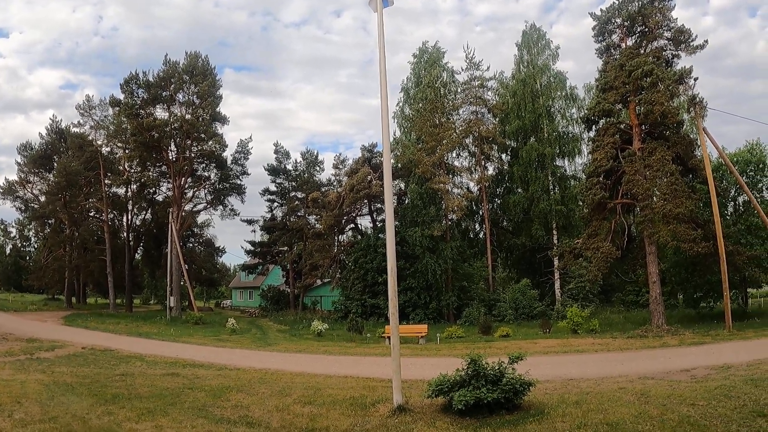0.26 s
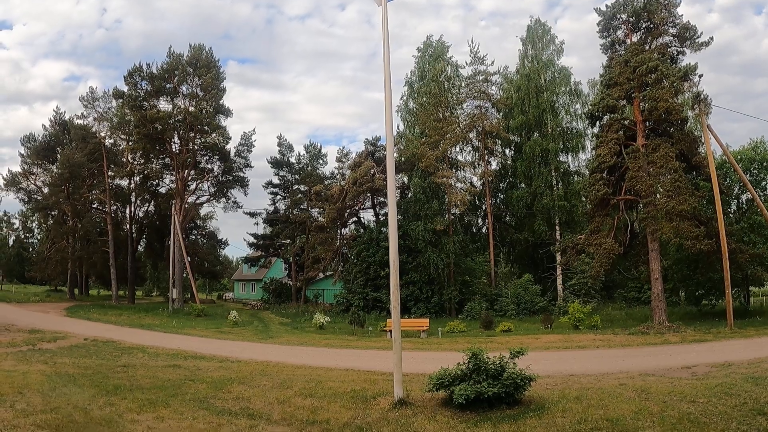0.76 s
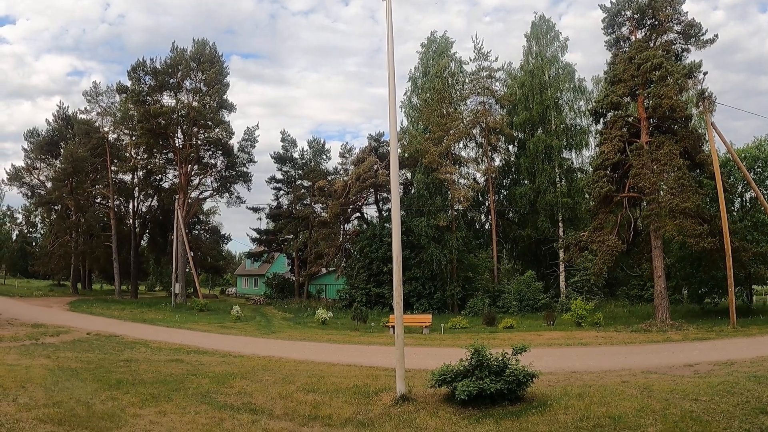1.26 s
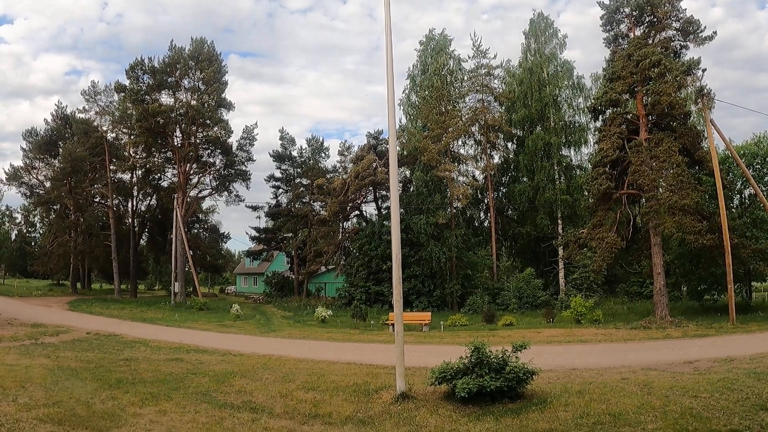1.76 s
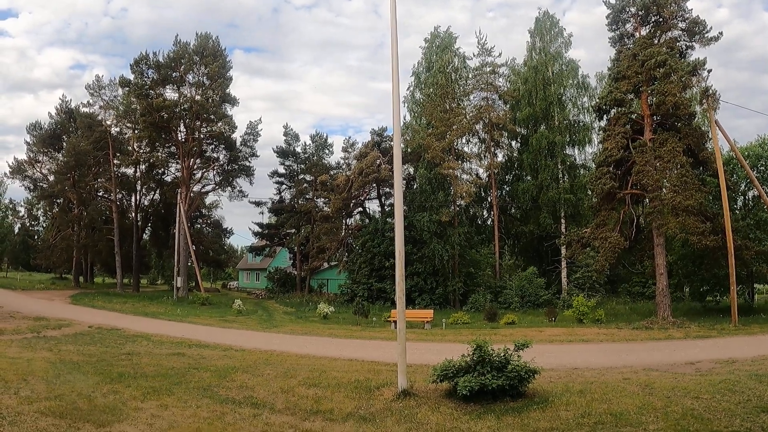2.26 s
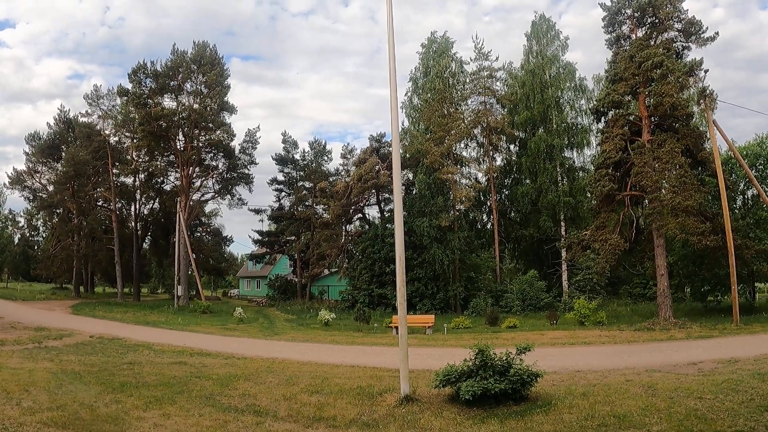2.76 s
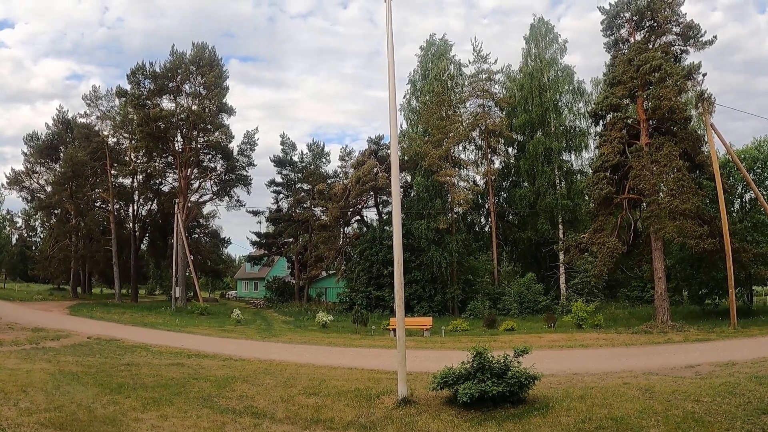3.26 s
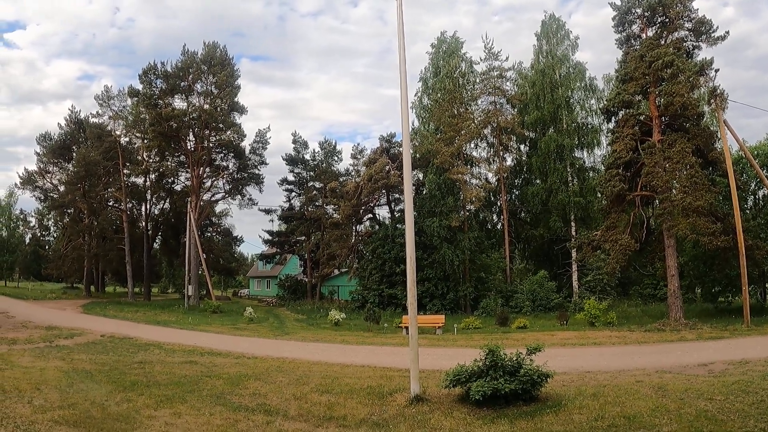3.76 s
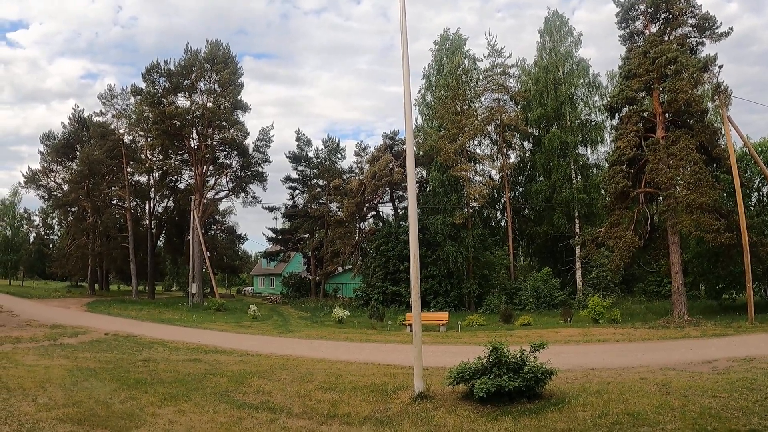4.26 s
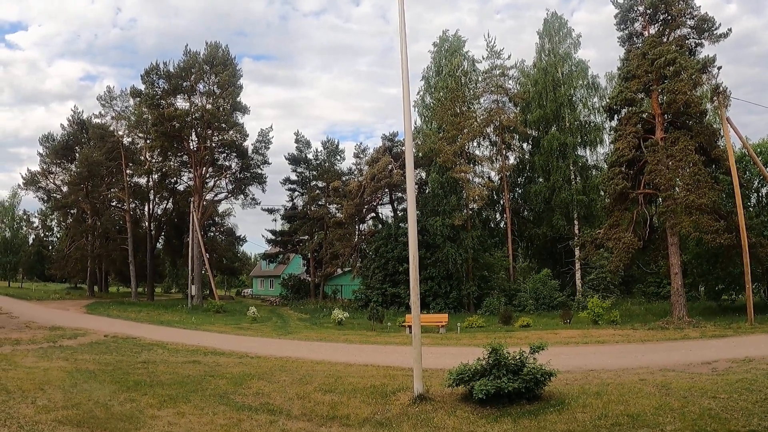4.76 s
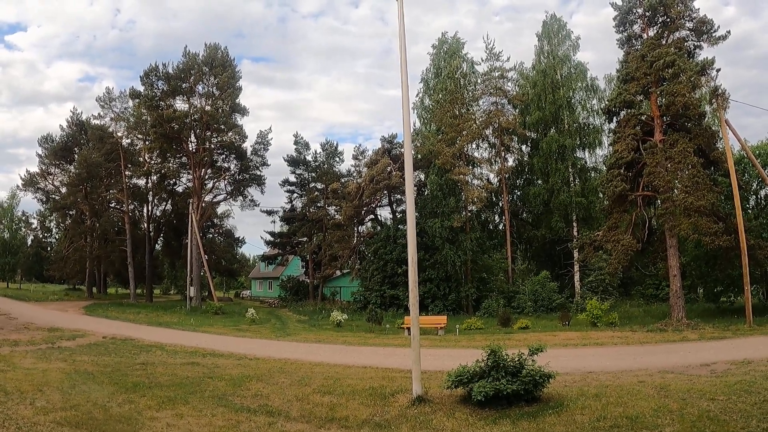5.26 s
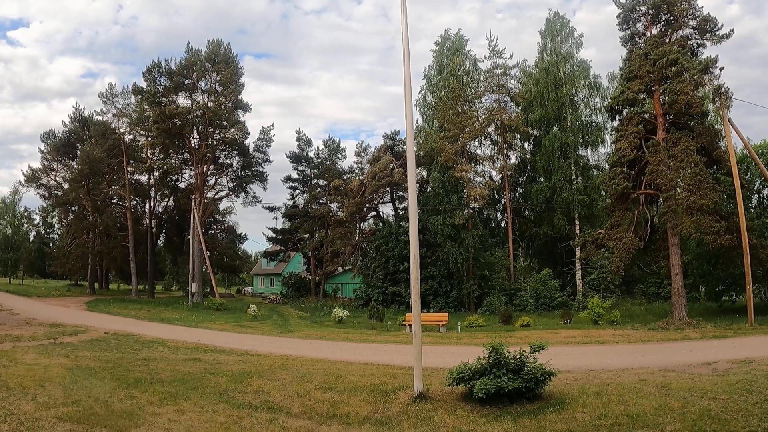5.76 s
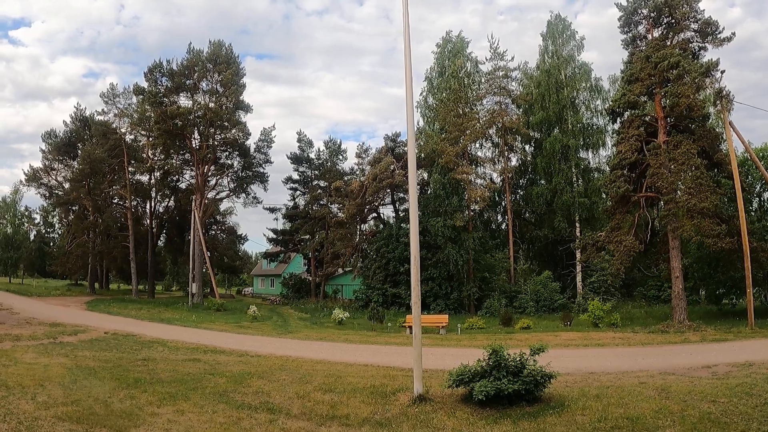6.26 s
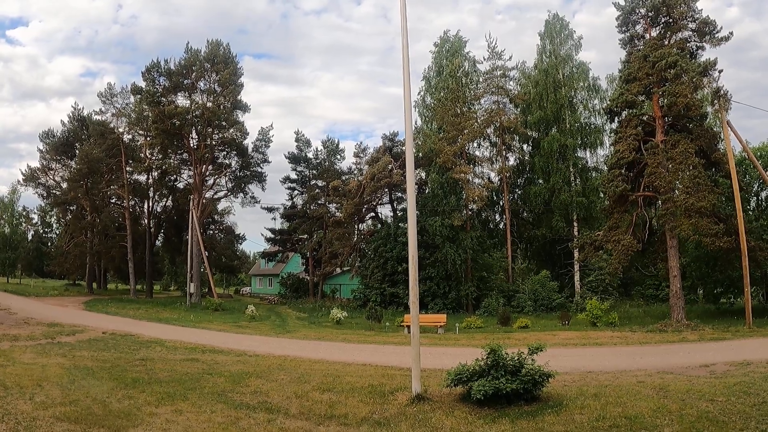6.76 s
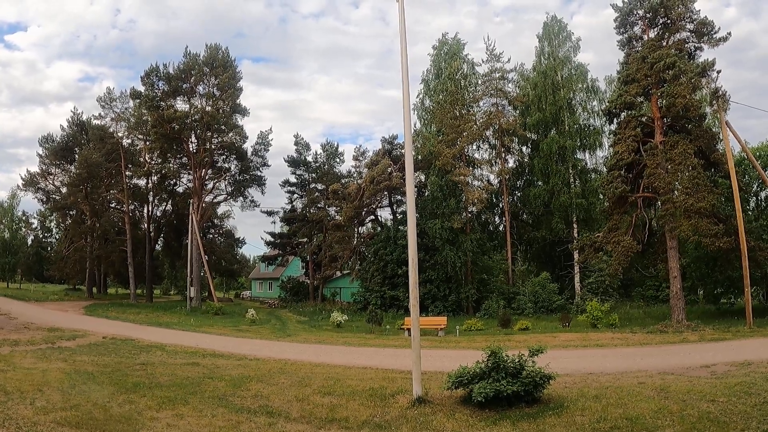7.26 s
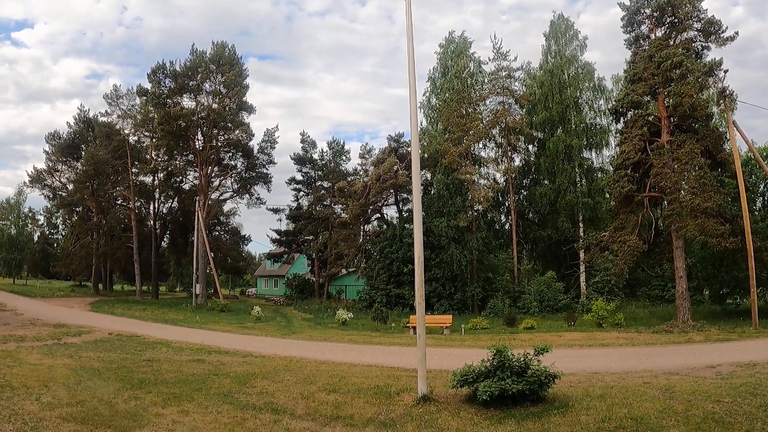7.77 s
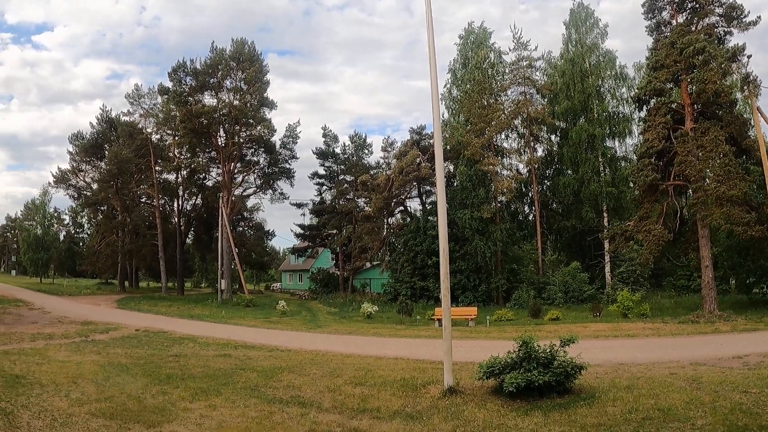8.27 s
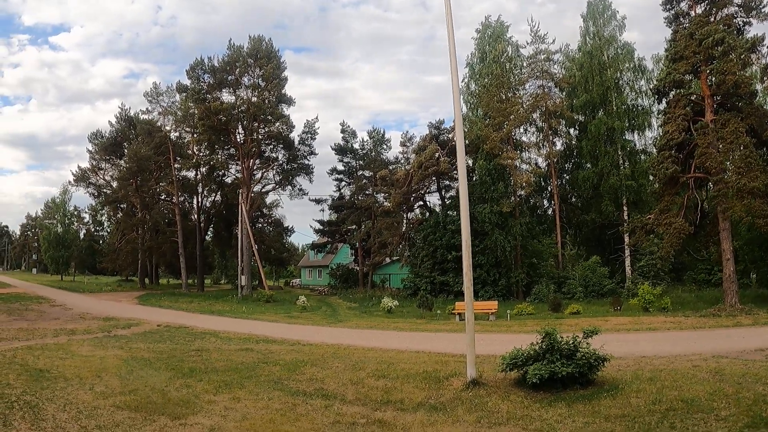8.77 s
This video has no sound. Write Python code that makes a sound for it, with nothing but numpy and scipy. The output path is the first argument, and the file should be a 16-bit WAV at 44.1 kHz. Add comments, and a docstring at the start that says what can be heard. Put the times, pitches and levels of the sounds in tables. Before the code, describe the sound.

An oriole's fluted whistles and harsh catlike squalls alternate with a rattling finch over distant birdsong, low hum and late microphone bumps in a wooded park.

```python
"""Birds in a pine and birch clearing

An oriole flutes three phrases in gliding tones; catlike squalls in rough, throaty overtone stacks cut in,
with one short arched call of another bird. A finch rattles through repeated syllables and buzzes;
short gliding whistles and chips fill the gaps, some of them faint oriole notes.
Sparse reflections make the wood answer, over a far chorus of noise and chirps and a low hum of drifting noise.
The hand on the microphone gives low rumbles, ringing knocks and dry ticks.
"""
import sys
import numpy as np
from scipy import signal
from scipy.fft import rfft, irfft
from scipy.io import wavfile
from scipy.ndimage import uniform_filter1d

SR = 44100
rng = np.random.default_rng(int(sys.argv[2]) if len(sys.argv) > 2 else 0)


def output_pcm(signal):
    """Save a mono or channel-first signal as 16-bit PCM at the path in sys.argv[1].

    Samples are clipped to [-1, 1] before scaling.
    """
    pcm = np.clip(np.atleast_2d(signal).T, -1, 1) * 32767
    wavfile.write(sys.argv[1], SR, np.round(pcm).astype(np.int16))


N = 397341  # length in samples

# Fluted oriole notes: start_s, slide_in_s, hold_s, slide_out_s, from_hz, held_hz, to_hz,
# level_db (at the end of the hold), swell_db (rise over the hold)
ORIOLE_NOTES = [ (1.366, 0.047, 0.015, 0.074, 1537, 2266, 1940, -55.5, -5.5),
                (1.548, 0.013, 0.083, .015, 2143, 2070, 2090, -44.5, 7.5),
                (1.657, 0.021, 0.057, 0.098, 2100, 2073, 1986, -35, 7),
                (1.895, .045, 0.059, 0.0082, 1343, 1733, 1770, -36, -1.5),
                (2.022, 0.017, 0.0032, 0.031, 2120, 1905, 1732, -33, 4),
                (2.079, 0.016, .022, 0.074, 1502, 1442, 1113, -43.5, -6.5),
                (6.029, 0.046, 0.065, 0.045, 2210, 2470, 2310, -52.5, 0),
                (6.178, 0.026, 0.01, 0.0059, 1730, 1945, 1950, -51.5, -4.5),
                (6.251, 0.039, 0.015, 0.0072, 1898, 1736, 1743, -34, 6),
                (6.388, 0.035, 0.021, 0.039, 2207, 2136, 2000, -42.5, 7.5),
                (6.501, 0.06, 0.024, 0.046, 1387, 1718, 1385, -34, 1),
                (6.691, 0.053, 0.032, 0.023, 1277, 1189, 1030, -47, 1.5),
                (6.801, .04, .135, .06, 1410, 1624, 1242, -41.5, -7.5),
                (7.03, 0.029, 0.013, 0.011, 1258, 1154, 1150, -56.5, -2.5),
                (8.278, 0.066, 0.024, 0.059, 2260, 1790, 1417, -37.5, 6),
                (8.515, 0.012, 0.037, 0.0084, 1616, 1534, 1500, -51.5, 14),
                (8.572, 0.044, .05, 0.018, 1538, 2075, 1700, -44, 0),
                (8.687, 0.027, 0.0085, 0.014, 1530, 1433, 1380, -52, 2),
                (8.742, 0.041, 0.013, 0.0092, 1364, 1297, 1180, -48, 8), ]
# Where whistles and chips lean in stereo: time_s, left_over_right_db
WHISTLE_PAN = [(1.6, 0.5), (2.1, 1), (6.1, 0), (6.8, 2.5), (8.4, 1.5)]
CREEP_HZ_PER_S = 300  # a held note creeps upward
FLUTE_IN_DB, FLUTE_OUT_DB = -12, -8.5  # level offset at the far ends of the slides

# Throaty calls, one list a call: four catlike squalls and, third, a short arched call of another bird:
# time_s, pitch_hz (before the jump at the crack), level_db (before wavering)
THROATY_CALLS = [
    [(0, 868, -36), (.03, 915, -50), (.05, 999, -42.5), (.13, 1007, -46.5), (.2, 1010, -51),
     (.28, 940, -59.5)],
    [(.47, 731, -57.5), (.51, 672.6, -53.5), (.59, 737, -49), (.65, 985, -42.5), (.74, 861, -47.5),
     (.795, 1023, -43.5), (.9, 952.4, -41.5), (1.02, 829, -56.5)],
    [(2.97, 935, -59), (2.995, 1204, -64), (3.04, 1253, -59), (3.085, 1190, -61)],
    [(3.87, 677, -51), (3.91, 741, -44.5), (4, 758.5, -45.5), (4.1, 830, -44.5), (4.18, 876, -44.5),
     (4.25, 899, -46), (4.29, 899, -48), (4.335, 1010, -55.5)],
    [(5.18, 819, -56.5), (5.245, 693, -56.5), (5.315, 788, -43.5), (5.41, 918, -40), (5.46, 851.5, -45),
     (5.53, 998, -41.5), (5.585, 1096, -39), (5.63, 1107, -40.5), (5.74, 1224, -47), (5.78, 1200, -75.5)],
]
# Roughening, one row a call: crack_s, shriek_s (scene time), pitch_jump (share of pitch);
# a change timed after the end of its call is never reached
CALL_CHANGES = [(.13, .19, .02), (.798, .92, .1), (3.2, 3.2, 0), (4.07, 4.28, 0), (5.595, 5.64, -.07)]
# Shrillness, one row a call: clear (0-1), shrieking (0-1)
CALL_SHRILLNESS = [(0.12, 0.57), (0.29, 1), (0.1, .3), (0.014, 0.85), (0.21, 0.72)]
# Throat response of a mellow call: frequency_hz, gain_db (relative)
MELLOW_THROAT = [(700, -51.5), (960, -21), (1500, -13.5), (2050, 1.5), (2600, 14.5), (3300, 9), (3850, -13),
                 (5300, -34.5), (7000, -15), (8800, -41), (10500, -34.5), (12300, -34), (14000, -58)]
# Throat response of a shrill call: frequency_hz, gain_db (relative)
SHRILL_THROAT = [(410, -63), (700, -55), (958, -33), (1090, -26), (2190, -6.5), (3400, -7.5), (4360, 11.5),
                 (5140, 4.5), (6200, 7.5), (8590, -31), (10600, -7.5), (11300, -22.5), (14000, -37)]
# Time to turn into the crack and into the shriek: seconds, seconds
TURN_S = (.03, .07)
CRACK_ROUGHNESS, SHRIEK_ROUGHNESS, HALF_PITCH_DEPTH = .26, .75, .55  # each 0-1

# Finch syllables, each a list of strokes: time_s (from the syllable's start), pitch_hz, level_db (relative)
FINCH_SYLLABLES = [
    [[(-.028, 4800, -12), (-.021, 4950, -4), (-.016, 4800, -8), (-.011, 3600, -22)], [(-.010, 3400, -12),
     (-.002, 4200, -6), (.003, 5000, 0), (.006, 5450, -8), (.016, 5780, -13)], [(.013, 4000, -16),
     (.022, 5200, -12), (.027, 5650, -5), (.038, 5780, -12)]],
    [[(-.015, 7940, -26), (-.011, 5110, -6), (-.007, 3770, -5.5)], [(-.004, 3810, -6), (.002, 4990, 0.5),
     (.009, 5340, -15)], [(.017, 4980, 0), (.028, 3894, 5), (.038, 2908, 2), (.044, 3427, 10),
     (.051, 4200, -16)], [(.052, 3420, -6.5), (.062, 3038, 6), (.076, 2177, -6)]],
    [[(-.003, 3230, -31), (.002, 3990, 6.5), (.009, 4360, -1.5)], [(.014, 4377, -19), (.024, 3170, 14.5),
     (.034, 2760, 4.5), (.045, 2170, 4)], [(.054, 2280, -5.5), (.063, 3255, 13), (.074, 3580, 3.5)],
     [(.082, 2402, 12.5), (.092, 2393, 5), (.106, 2007, 4.5)], [(.100, 2172, -11), (.110, 2376, -3),
     (.123, 2570, -26)]],
]
# Finch phrases: syllable (index), count, start_s, first_gap_s, shortening_s (of each next gap)
FINCH_PHRASES = [(0, 7, .2418, .0975, .0009), (1, 3, .8935, .1435, -.009), (0, 7, 4.7316, .0985, .0008),
                 (0, 7, 6.1848, .0982, .0018), (1, 6, 6.8247, .145, .0005), (2, 3, 7.6793, .1737, -.006)]
# Loudness, one row a phrase: first_syllable_db, full_voice_db (both relative)
FINCH_VOICE = [(-47, -31.5), (-34.5, -39.5), (-45.5, -39), (-45.5, -32), (-36.5, -34.5), (-39, -37.5)]
# Second and third partial of a stroke: level_db under the first
FINCH_PARTIALS_DB = (-40, -49)
WARM_UP_SYLLABLES = 2.7  # the voice covers 63% of the way to full in this many
# Echo off a trunk, one value a syllable type: level_db
TRUNK_ECHO_DB = (-12, -8.5, -7.5)
TRUNK_ECHO_S = 0.02

# Buzzy notes: start_s, slide_in_s, slide_out_s, from_hz, turn_hz, to_hz, level_db (before flutter),
# trill_width_hz (full width at the note's highest pitch)
BUZZ_NOTES = [(3.65, 0.06, 0.041, 4380, 4590, 4500, -61.5, 510),
              (7.819, 0.043, .02, 5400, 5000, 4800, -62, 500),
              (8.02, 0.016, 0.024, 5440, 5250, 4380, -61.5, 500),
              (8.209, 0.021, 0.078, 5730, 5580, 5820, -54.5, 600),
              (8.226, .02, 0.036, 5240, 5065, 5200, -49, 500),
              (8.375, .035, .19, 3900, 3808, 2220, -44.5, 1155)]

# Short gliding whistles and chips, some of them faint oriole notes:
# start_s, slide_in_s, slide_out_s, from_hz, turn_hz, to_hz, level_db
SHORT_NOTES = [ (1.061, 0.071, .08, 2040, 1915, 1855, -60.5), (1.171, 0.045, 0.14, 1600, 1546, 1420, -60.5),
               (1.51, 0.0096, 0.029, 1690, 1676, 1694, -50), (2.04, .03, .03, 7500, 7200, 7600, -68.5),
               (2.786, 0.016, 0.024, 4150, 3420, 3130, -48.5),
               (3.03, 0.014, 0.023, 3350, 2900, 2450, -53.5), (3.11, .015, 0.025, 2600, 2660, 2680, -55),
               (3.265, 0.013, 0.049, 5050, 5120, 5100, -68), (4.08, .02, .03, 4950, 4960, 5500, -66),
               (4.18, .03, 0.052, 5000, 4750, 5040, -61), (4.4, 0.019, .025, 2150, 1810, 1550, -82),
               (3.189, 0.024, 0.077, 8700, 7970, 8700, -74.5), (3.43, 0.027, 0.056, 4450, 3970, 3760, -65),
               (3.578, 0.025, 0.034, 6400, 5300, 5600, -65), (3.659, .035, .025, 3870, 3830, 3820, -61),
               (3.799, 0.032, 0.045, 4200, 3800, 2410, -59.5), (4.335, 0.018, 0.034, 3380, 3230, 3210, -55),
               (4.55, 0.019, .045, 2390, 2405, 2400, -62), (4.64, 0.026, 0.065, 2600, 2930, 3660, -55.5),
               (4.929, 0.025, 0.084, 3560, 2896, 4060, -53.5),
               (5.12, 0.083, 0.041, 3700, 3644, 3650, -54.5), (5.185, 0.032, 0.03, 3670, 3230, 3030, -51),
               (5.875, 0.023, 0.043, 3830, 3320, 3340, -49), (6.005, 0.018, 0.015, 3730, 3070, 2470, -56),
               (6.02, 0.048, 0.073, 1534, 2114, 2170, -57), (6.261, 0.023, 0.054, 3020, 3065, 2840, -48),
               (7.09, 0.013, .03, 2750, 2870, 3100, -48), (7.64, 0.017, 0.02, 3790, 3760, 3840, -50),
               (7.87, 0.07, 0.015, 1526, 1478, 1470, -58.5), (8.05, 0.022, 0.038, 1490, 1457, 1700, -52.5),
               (8.336, 0.019, 0.022, 2620, 3425, 4000, -41), (5.11, 0.064, .08, 2250, 2005, 1650, -60),
               (8.322, .006, 0.0097, 2920, 3550, 4260, -56), (8.876, 0.0056, 0.02, 2900, 2770, 2770, -60), ]
SHORT_IN_DB, SHORT_OUT_DB = 0, -6  # level offset at the far ends of the slides
# Thin high call that dives and climbs back: time_s, pitch_hz, level_db (relative)
SEEP_SHAPE = [(0, 9850, -12), (.024, 6440, 5.5), (.045, 7330, 1), (.06, 7900, 0), (.068, 9260, -23)]
# When the thin call sounds: time_s, level_db (added to its shape)
SEEP_TIMES = [(8.518, -68), (8.686, -64), (8.873, -63)]

# Phase between the channels for the near birds: frequency_hz, left_lead_rad
NEAR_BIRD_LEAD = [(1000, -1.1), (1700, -0.72), (3000, -0.87), (5000, -0.96), (9000, -0.56)]
WOOD_T60_S, WOOD_DB = 1.275, -7  # decay time at 1500 Hz, level of the whole tail

# Grip rumbles, one list a shift of the hand: time_s, level_db
GRIP_SHIFTS = [
    [(0, -52), (.12, -54.5), (.25, -61), (.33, -48.5), (.368, -38), (.42, -62), (.5, -68), (.8, -83)],
    [(8.26, -66), (8.33, -65), (8.42, -39.5), (8.52, -63), (8.62, -57.5), (8.72, -50.5), (8.9, -61),
     (9.01, -52.5)],
]
# Knocks on the microphone: time_s, peak_db
KNOCK_TIMES = [(8.38, -29.5), (8.609, -55), (8.99, -42.5)]
# Resonances of the microphone housing: pitch_hz, level_db (relative), t60_s
HOUSING_MODES = [(32, 1, .2), (189, 0, .12), (800, -28, .02)]
# Dry ticks: time_s, level_db (relative)
TICK_TIMES = [(8.7397, -41), (8.7588, -28), (8.8283, -30.5), (8.8743, -29), (8.8992, -29), (8.9292, -33),
              (8.9448, -40)]

# Loudness of the far chorus: time_s, level_db (of the hiss alone)
CHORUS_LEVEL = [(0, -59), (1.4, -55.5), (2.398, -57), (2.999, -58.5), (3.35, -62.5), (3.8, -58.5),
                (4.5, -58), (5.0, -59), (5.9, -56.5), (7.802, -56), (8.6, -62.5), (9.01, -62.5)]
# Spectrum of the far chorus: frequency_hz, density_db (relative, per Hz)
CHORUS_SPECTRUM = [(470, -80.5), (800, -35.5), (1390, -8.5), (1550, -4), (1790, 0), (2360, 0), (3000, 1),
                   (3720, 0.5), (5270, -11), (6230, -20), (8310, -26), (9370, -37), (14100, -35)]
CHIRPS_PER_S, CHIRPS_DB = 90, -2  # chirp level relative to the hiss

# Spectrum of the low air and hum: frequency_hz, density_db (relative, per Hz)
HUM_SPECTRUM = [(12, -66.5), (20, -25), (52, -23), (107, -32.5), (116, -21), (131, -13), (165, 1),
                (209, -7), (260, -14.5), (416, -20.5), (526, -23.5), (885, -25.5), (1100, -17), (1430, -16),
                (2420, -120)]
HUM_DB = -67

# Likeness of the steady noise at the two microphone ports: frequency_hz, likeness (0-1)
PORT_LIKENESS = [(60, 0.44), (150, 1), (370, 0.84), (900, 0.077), (2240, 0.11), (5520, 0.8), (13600, 0.19)]
# Balance of the steady noise: frequency_hz, left_over_right_db
PORT_BALANCE = [(60, -7.5), (150, 0.5), (370, -6), (900, -2.5), (2240, 3), (5520, -0.5), (13600, 7.5)]
# Phase of the steady noise: frequency_hz, left_lead_rad
PORT_LEAD = [(0, 1.3), (860, -1.42), (1210, -3), (3190, -2), (7060, 1), (8100, -2), (13800, -2.5)]
EDGE_HZ = 14000


def oriole(mix):
    """Fluted notes: near-pure syrinx tones slide in, hold and slide out, with a light shimmer."""
    for row in ORIOLE_NOTES:
        whistle(mix, *glide(*row, FLUTE_IN_DB, FLUTE_OUT_DB), shimmer=.3)


def throaty_calls(mix):
    """A stack of overtones through the throat; roughness smears each overtone into a band of noise."""
    for rows, changes, shrillness in zip(THROATY_CALLS, CALL_CHANGES, CALL_SHRILLNESS):
        start, (hz, db) = unroll(rows)
        count = len(hz)
        crack_s, shriek_s, jump = changes
        clear, harsh = shrillness
        t = start + np.arange(count) / SR
        cracked = np.clip((t - crack_s) / TURN_S[0], 0, 1)
        shrieking = np.clip((t - shriek_s) / TURN_S[1], 0, 1)
        rough = np.maximum(CRACK_ROUGHNESS * cracked, SHRIEK_ROUGHNESS * shrieking)
        shrill = np.clip(clear + (harsh - clear) * shrieking, 0, 1)

        hz = hz * (1 + jump * (cracked > 0))
        # unsteady vocal folds
        hz = hz * (1 + .014 * (1 + .4 * cracked) * flutter(count, hz=45).real)
        db = db + 2.2 * flutter(count, hz=35).real
        mouth = (900 / hz) ** .25  # the beak opens with rising pitch and lifts the throat resonance
        call, power = 0, 0
        for k in range(1, 17):
            mellow_db = read(MELLOW_THROAT, k * hz * mouth)
            throat_db = (1 - shrill) * mellow_db + shrill * read(SHRILL_THROAT, k * hz)
            blur = np.clip(rough + .07 * max(k - 4, 0), 0, 1)  # high overtones break up first
            smear = np.sqrt(1 - blur) + np.sqrt(blur) * flutter(count, hz=170 + 50 * k)
            waver_db = 1.8 * flutter(count, hz=30).real  # each overtone comes and goes by itself
            call = call + (tone(k * hz, throat_db + waver_db, edge=0.026) * smear).real
            power = power + gain_of(2 * throat_db)
        # alternate strong and weak pulses put lines at half the pitch
        call = call * (1 + HALF_PITCH_DEPTH * cracked * np.cos(np.pi * np.cumsum(hz) / SR))
        add(mix, start, gain_of(db) * call / np.sqrt(power), pan_db=0.2)


def finch(mix):
    """Repeats a syllable of swept strokes, pitch and level varying slightly, with an echo off a trunk."""
    for phrase, (first_db, full_db) in zip(FINCH_PHRASES, FINCH_VOICE):
        kind, count, first_s, gap_s, shortening_s = phrase
        for k in range(count):
            s = first_s + k * gap_s - shortening_s * k * (k - 1) / 2
            voice_db = full_db + (first_db - full_db) * np.exp(-k / WARM_UP_SYLLABLES)
            for rows in FINCH_SYLLABLES[kind]:
                start, (hz, db) = unroll(rows)
                detune = rng.normal(1, 0.0086)
                stroke = tone(hz * detune, db + voice_db - 9 + rng.normal(0, 1.5), edge=0.13)
                for partial, partial_db in enumerate(FINCH_PARTIALS_DB, start=2):
                    overtone = abs(stroke) * np.exp(1j * partial * np.angle(stroke))
                    stroke = stroke + gain_of(partial_db) * overtone
                add(mix, s + start, stroke.real, pan_db=0.5)
                echo = gain_of(TRUNK_ECHO_DB[kind]) * stroke.real
                add(mix, s + start + TRUNK_ECHO_S, echo, pan_db=3)


def buzzes(mix):
    """A 230 Hz pitch trill and a rough flutter of level turn a gliding tone into a buzz."""
    for *row, width_hz in BUZZ_NOTES:
        s, hz, db = short_note(*row)
        depth_hz = width_hz / 2 * (hz / hz.max()) ** 2.5
        trilled_hz = hz + depth_hz * np.sin(2 * np.pi * 230 * np.arange(len(hz)) / SR)
        note = tone(trilled_hz, db) + tone(2 * trilled_hz, db - 29)
        rough = 0.78 + 0.98 * flutter(len(hz), hz=219)
        add(mix, s, (note * rough).real)


def whistles_and_chips(mix):
    """Short gliding whistles, chips and thin diving calls: pure tones with a strong shimmer."""
    for row in SHORT_NOTES:
        whistle(mix, *short_note(*row), shimmer=.55)
    hz, shape_db = unroll(SEEP_SHAPE)[1]
    for s, level_db in SEEP_TIMES:
        whistle(mix, s, hz, shape_db + level_db, shimmer=.55)


def wood(x):
    """Sparse reflections from trunks, one in every 20 samples; treble dies faster."""
    taps = np.zeros((2, 2 * SR))
    at = np.arange(400, 2 * SR - 20, 20)
    at = at + rng.integers(0, 20, (2, len(at)))
    np.put_along_axis(taps, at, rng.choice([-1., 1.], at.shape), 1)
    taps[1] = 0.82 * taps[0] + 0.59 * taps[1]  # the channels share most reflections
    hz, t, z = signal.stft(taps, SR, nperseg=256)
    t60 = WOOD_T60_S * (2000 / (hz + 500))[:, None] ** 0.37
    near = 4.0 * gain_of(-60 * t / 0.1)  # the nearest trees answer first and loudest
    tail = signal.istft(z * (gain_of(-60 * t / t60) + near), SR, nperseg=256)[1]
    tail *= gain_of(WOOD_DB) / np.linalg.norm(tail, axis=1, keepdims=True)
    return signal.fftconvolve(x, tail, axes=1)[:, :N]


def grip(mix):
    """The shifting hand: narrow noise around 30 Hz swells and fades as a rumble."""
    for rows in GRIP_SHIFTS:
        s, (db,) = unroll(rows)
        rumble = flutter(len(db), hz=15.2) * np.exp(2j * np.pi * 30 * np.arange(len(db)) / SR)
        add(mix, s, np.sqrt(2) * gain_of(db) * rumble.real, pan_db=-4.0)


def knocks(mix):
    """Each knock rings the housing as a sum of dying sine resonances."""
    t = np.arange(6000) / SR
    ring = sum(gain_of(db - 60 * t / t60) * np.sin(2 * np.pi * hz * t) for hz, db, t60 in HOUSING_MODES)
    for s, db in KNOCK_TIMES:
        add(mix, s, gain_of(db) * ring / abs(ring).max(), pan_db=-6.5)


def ticks(mix):
    """A dry tick is a 2600 Hz sine that dies within about a millisecond."""
    t = np.arange(200) / SR
    snap = np.sin(2 * np.pi * 2600 * t) * t * np.exp(-t / .00016)
    for s, db in TICK_TIMES:
        add(mix, s, gain_of(db - 10) * snap / abs(snap).max())


def chorus():
    """Many distant birds: short random glides over the hiss into which the rest have blurred."""
    chirps = np.zeros((2, N))
    for at, pitch, bend, length, size, side in rng.random((round(CHIRPS_PER_S * N / SR), 6)):
        count = round((0.0132 + 0.029 * length ** 2) * SR)
        hz = 2100 * 2.4 ** pitch * np.linspace(1, 1.7 ** (2 * bend - 1), count)
        db = read(CHORUS_SPECTRUM, hz) - 16 * size ** 1.9
        add(chirps, at * N / SR, tone(hz, db, edge=.7).real, 8 * side - 4)
    hiss = air(CHORUS_SPECTRUM, patchy_db=2)
    both = hiss + gain_of(CHIRPS_DB) * evened(.8 * chirps + 2 * wood(chirps))
    return both * gain_of(np.interp(np.arange(N) / SR, *np.transpose(CHORUS_LEVEL)))


def hum():
    """Low air and hum: shaped noise whose bands waver in level."""
    return gain_of(HUM_DB) * air(HUM_SPECTRUM, patchy_db=2.0, size=4096)


def air(spectrum, patchy_db, size=1024):
    """Noise at two microphone ports, partly alike, its level drifting in patches of time and pitch; rms 1."""
    frames, hz = 4 * N // size + 5, np.fft.rfftfreq(size, 1 / SR)
    a, b, c, d, patches = rng.standard_normal((frames, len(hz), 5)).T
    patches = evened(uniform_filter1d(uniform_filter1d(patches, 8, 0), 10, 1))
    same = np.clip(read(PORT_LIKENESS, hz), 0, 1)[:, None]
    left, other = a + 1j * b, c + 1j * d
    port = (gain_of(-read(PORT_BALANCE, hz)) * np.exp(-1j * read(PORT_LEAD, hz)))[:, None]
    right = port * (same * left + np.sqrt(1 - same ** 2) * other)
    z = np.array([left, right])
    z *= gain_of(read(spectrum, hz)[:, None] + patchy_db * patches)
    return evened(signal.istft(z, nperseg=size, noverlap=3 * size // 4)[1][:, :N])


def whistle(mix, s, hz, db, shimmer):
    """A tone with a faint fifth partial that shimmers on its way through moving leaves."""
    leaves = np.sqrt(1 - shimmer ** 2) + shimmer * flutter(len(hz), hz=50.3)
    note = tone(hz, db, edge=.12) + tone(5 * hz, db - 48)
    add(mix, s, (leaves * note).real, np.interp(s, *np.transpose(WHISTLE_PAN)))


def glide(start, in_s, hold_s, out_s, from_hz, held_hz, to_hz, db, swell_db, in_db, out_db):
    """Start, pitch and level of a note that slides in, holds with a creep and a swell, and slides out."""
    t = np.arange(0, in_s + hold_s + out_s, 1 / SR)
    into = np.clip(t / in_s, 0, 1)
    held = np.clip((t - in_s) / (hold_s + 1e-6), 0, 1)
    out = np.clip((t - in_s - hold_s) / out_s, 0, 1)
    ease_in, ease_out = np.sin(np.pi / 2 * into), np.sin(np.pi / 2 * out) ** 2
    creep_hz = CREEP_HZ_PER_S * hold_s * (held - ease_out)
    hz = from_hz + (held_hz - from_hz) * ease_in + creep_hz + (to_hz - held_hz) * ease_out
    return start, hz, db + in_db * (1 - into) ** 2 - swell_db * (1 - held) + out_db * out ** 2


def short_note(start, in_s, out_s, from_hz, turn_hz, to_hz, db):
    """A short gliding note with no hold."""
    return glide(start, in_s, 0, out_s, from_hz, turn_hz, to_hz, db, 0, SHORT_IN_DB, SHORT_OUT_DB)


def tone(hz, db, edge=0.16):
    """A near-pure complex tone whose real part has the given rms level; edge is the faded share."""
    turns = np.cumsum(hz) / SR + rng.random()
    return np.sqrt(2) * gain_of(db) * signal.windows.tukey(len(hz), edge) * np.exp(2j * np.pi * turns)


def flutter(count, hz):
    """Complex noise of power 1, smooth below hz."""
    z = signal.lfilter(*signal.butter(2, hz, fs=SR), rng.standard_normal((2, count + 500)))[:, 500:]
    return (evened(z[0]) + 1j * evened(z[1])) / np.sqrt(2)


def unroll(rows):
    """Start time and the columns of a table, sample by sample, corners rounded."""
    s, *columns = np.transpose(rows)
    t = np.arange(s[0], s[-1], 1 / SR)
    width = len(t) // (3 * len(s))
    return s[0], [uniform_filter1d(np.interp(t, s, c), width, mode="nearest") for c in columns]


def read(points, hz):
    """Reads a curve between its points on a logarithmic frequency scale."""
    f, value = np.transpose(points)
    return np.interp(np.log(hz + 1), np.log(f + 1), value)


def add(mix, s, sound, pan_db=0):
    """Places a sound in both channels, pan_db louder on the left than on the right."""
    part = mix[:, max(round(s * SR), 0):][:, :len(sound)]
    sides = gain_of(np.outer([.5, -.5], pan_db * np.ones(len(sound))))
    part += (sound * sides)[:, :part.shape[1]]


def gain_of(db):
    """Amplitude factor of a level in dB."""
    return 10 ** (np.asarray(db) / 20)


def evened(x):
    """Scales a signal to rms 1."""
    return x / np.sqrt(np.mean(x ** 2) + 1e-20)


def scene():
    """Near birds with their reflections, over the chorus, the hum and the handling."""
    birds = np.zeros((2, N))
    for source in (oriole, throaty_calls, finch, buzzes, whistles_and_chips):
        source(birds)
    lead = read(NEAR_BIRD_LEAD, np.fft.rfftfreq(N, 1 / SR))
    birds[1] = irfft(rfft(birds[1]) * np.exp(-1j * lead), N)
    handling = np.zeros((2, N))
    for source in (grip, knocks, ticks):
        source(handling)
    return birds + wood(birds) + chorus() + hum() + handling


def record(dry):
    """The band limit of the recorder: a steep low-pass at EDGE_HZ."""
    return signal.oaconvolve(dry, signal.firwin(511, EDGE_HZ, window=("kaiser", 9), fs=SR)[None], "same")


dry = scene()
out = record(dry)
output_pcm(out)
```